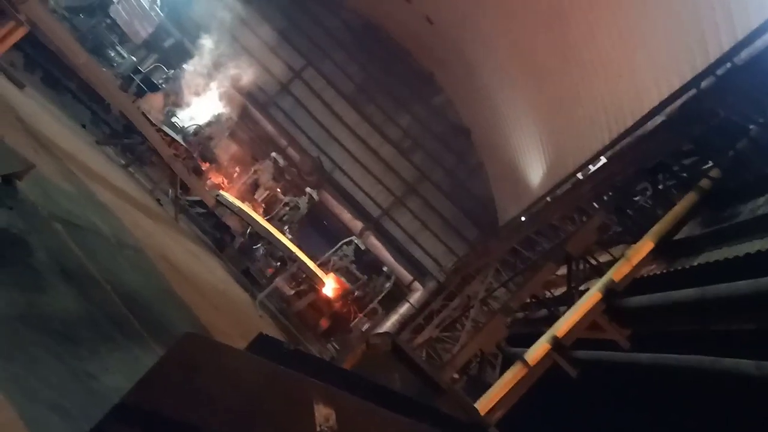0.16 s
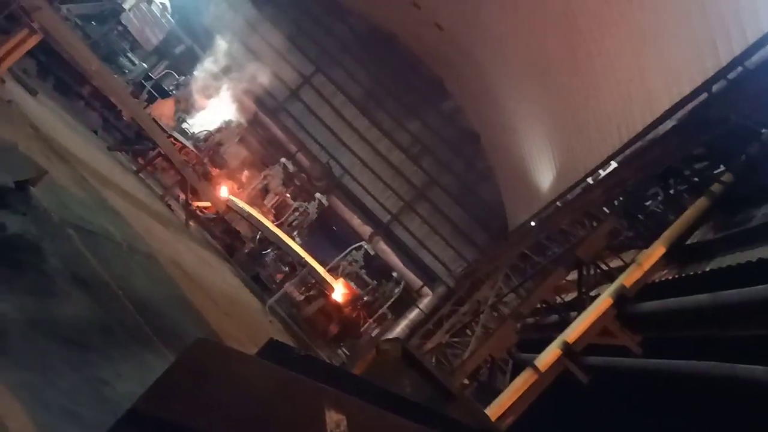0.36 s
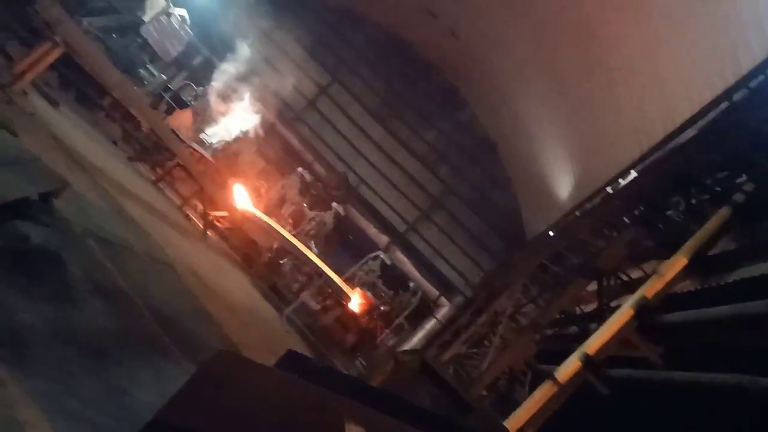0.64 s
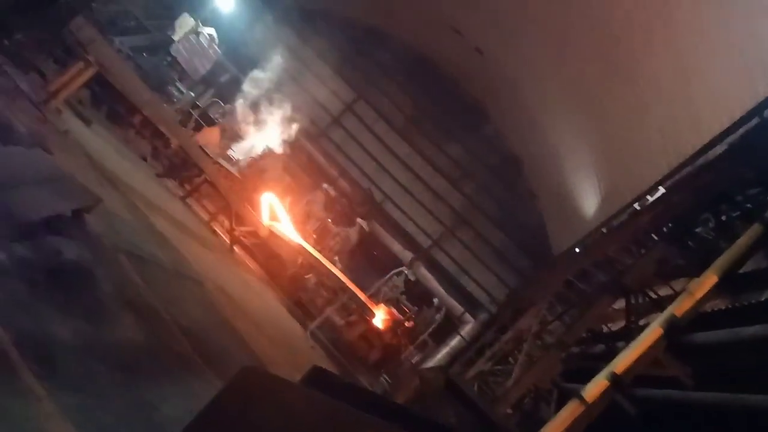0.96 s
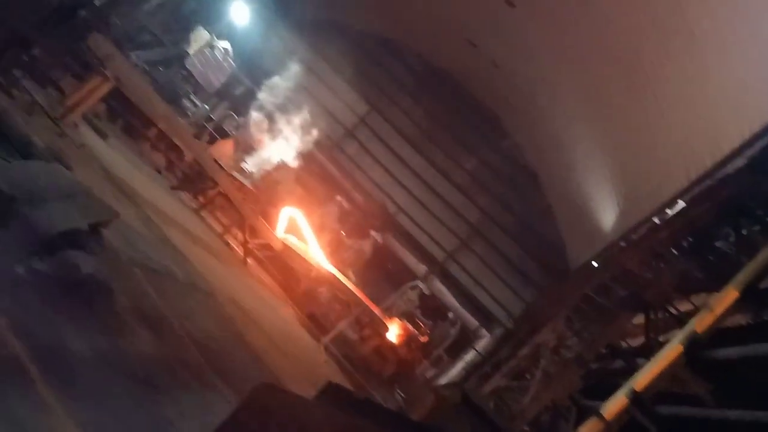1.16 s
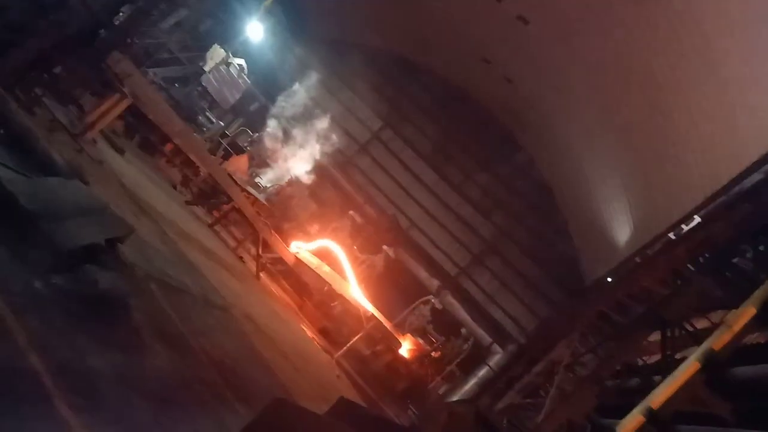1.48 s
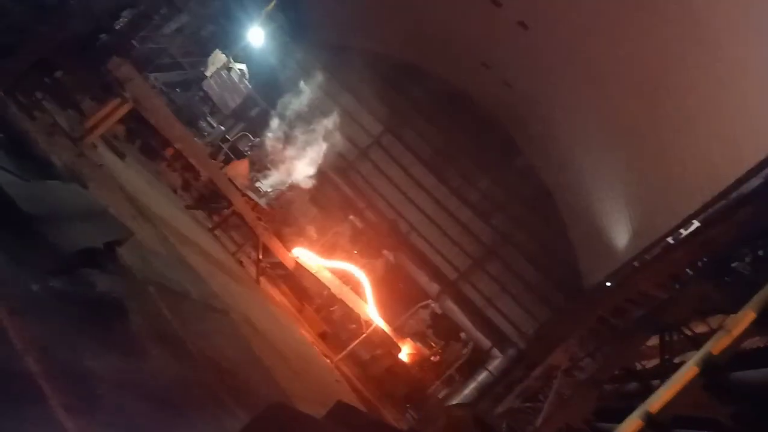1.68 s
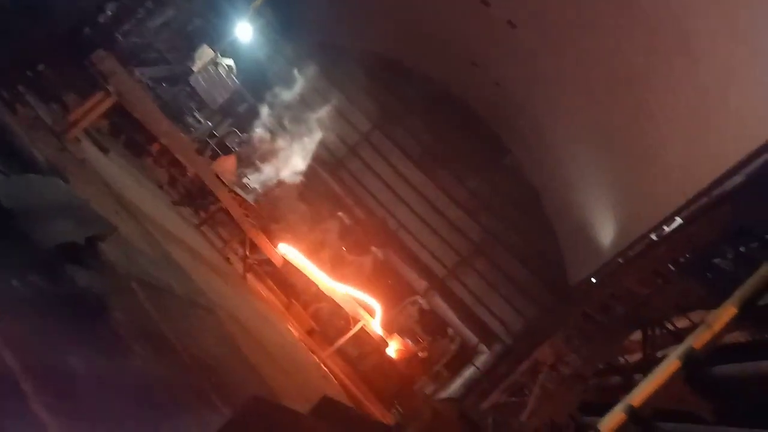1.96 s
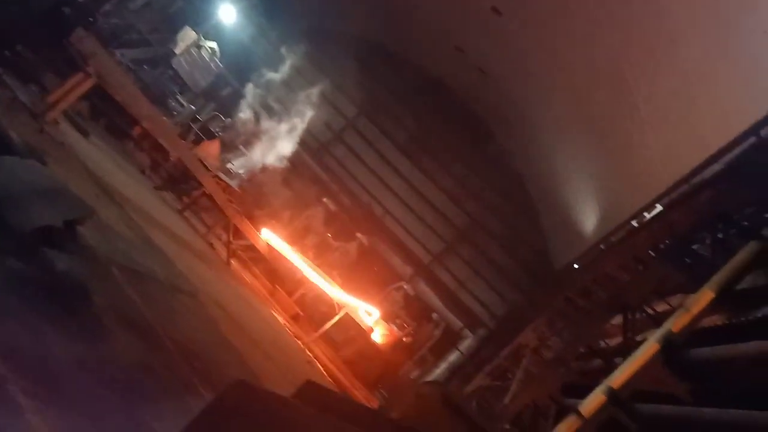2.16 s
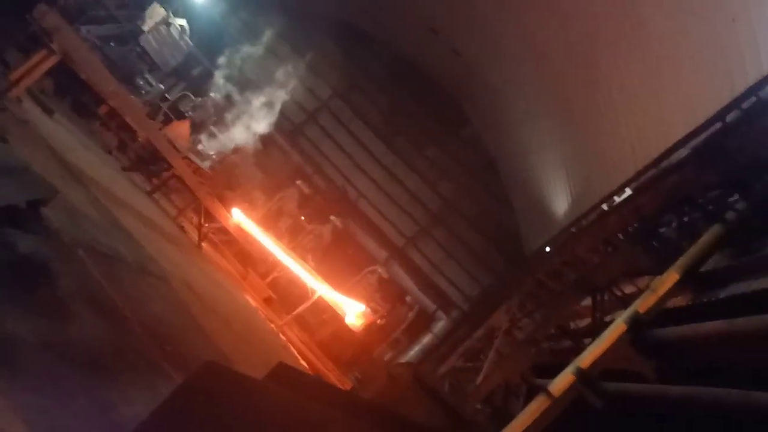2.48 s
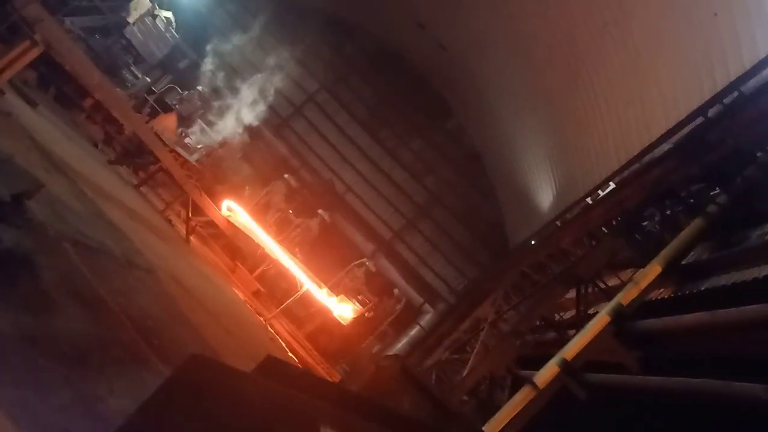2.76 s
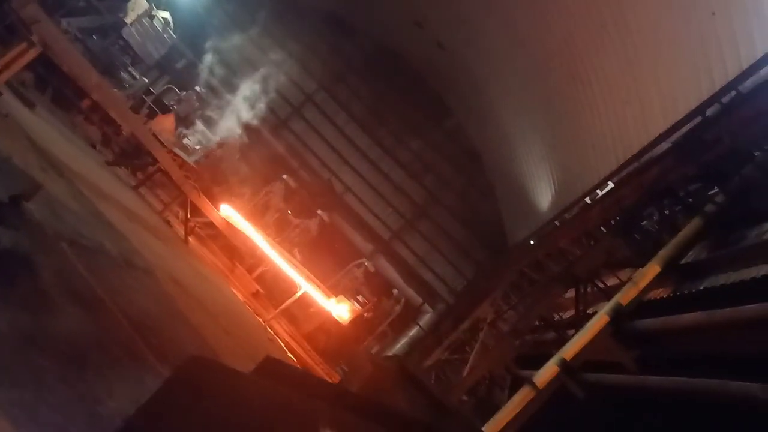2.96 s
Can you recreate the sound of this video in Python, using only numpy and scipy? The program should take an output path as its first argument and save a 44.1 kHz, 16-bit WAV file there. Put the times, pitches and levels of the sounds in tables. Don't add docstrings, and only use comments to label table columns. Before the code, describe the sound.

A steel rolling mill roars and hums continuously while metal bars clank, thud and scrape

```python
import sys
import numpy as np
from scipy import signal
from scipy.fft import rfft, irfft, next_fast_len
from scipy.io import wavfile
from scipy.ndimage import uniform_filter1d

SR = 44100
rng = np.random.default_rng(int(sys.argv[2]) if len(sys.argv) > 2 else 0)


def generate_wav(signal):
    frames = np.transpose(np.atleast_2d(signal))
    scaled = np.clip(frames, -1, 1) * 32767
    pcm = np.round(scaled).astype(np.int16)
    wavfile.write(sys.argv[1], SR, pcm)


def linear_from_db(decibels):
    return 10 ** (np.asarray(decibels, float) / 20)


N = 138033

# frequency [Hz], level [dB].
CRACK = [(700, -18), (1100, 1), (1800, 10), (2700, 11), (3500, 0), (5000, -4), (6400, -8), (7200, -43)]


def evened(x):
    return x / np.sqrt(np.mean(x ** 2) + 1e-20)


def read(points, hz, outside_db=None):
    f, value = np.transpose(points)
    return np.interp(np.log(hz + 1), np.log(f + 1), value, outside_db, outside_db)


def colour(x, points):
    size = next_fast_len(x.shape[-1] + 2048)
    gain = linear_from_db(read(points, np.fft.rfftfreq(size, 1 / SR), -80))
    return irfft(rfft(x, size) * gain, size)[..., :x.shape[-1]]


def resonate(x, hz, width):
    turn = np.exp(2j * np.pi * hz * np.arange(x.shape[-1]) / SR)
    r = np.exp(-np.pi * abs(width) / SR)
    return 2 * (turn * signal.lfilter([1 - r], [1, -r], x / turn)).real


def diffuse(length):
    # frequency in Hz, left-right likeness [-1 to 1].
    likeness = [(60, 1), (130, 0.89), (280, 0.73), (610, 0.26), (1330, -0.097), (2900, -0.02),
                (6290, -0.16)]
    # frequency in Hz, left minus right in dB.
    left_excess = [(60, .3), (130, .2), (280, -1.2), (610, -1.4), (1200, -2), (2400, .9), (4500, .9),
                   (9000, -.8)]
    a, b = rfft(rng.standard_normal((2, length)))
    hz = np.fft.rfftfreq(length, 1 / SR)
    same = np.clip(read(likeness, hz), -1, 1)
    lean = linear_from_db(read(left_excess, hz) / 2)
    right = same * a + np.sqrt(1 - same ** 2) * b
    return irfft(np.array([a * lean, right / lean]), length)


def follow(points):
    return linear_from_db(np.interp(np.arange(N) / SR, *np.transpose(points), -99, -99))


def load(share=1):
    # time in seconds, level in dB.
    effort = [(0, 3.5), (.3, 2), (.6, 3), (.9, 1), (1.2, 1), (1.5, 3), (1.9, 1.5), (2.2, 4.5), (2.6, 1.74),
              (2.9, 1), (3.13, 0.5)]
    return linear_from_db(share * np.interp(np.arange(N) / SR, *np.transpose(effort)))


def restless(x):
    patchy_db, flicker_db = 0.85, 0.3
    z = signal.stft(x, nperseg=512)[2]
    patches = uniform_filter1d(rng.standard_normal(z.shape[1:]), size=8, axis=0)
    patches = evened(uniform_filter1d(patches, size=12, axis=1))
    flicker = evened(uniform_filter1d(rng.standard_normal(z.shape[2]), size=4))
    return signal.istft(z * linear_from_db(patchy_db * patches + flicker_db * flicker), nperseg=512)[1][:, :N]


def roar():
    # frequency in Hz, density in dB per Hz.
    drive_rumble = [(25, -54), (60, -22), (100, -11), (250, -4), (420, -1.5), (800, -5), (1150, -11.5),
                    (1700, -45)]
    water_hiss = [(700, -20), (1300, -1.5), (2700, -5), (3300, -10.5), (4200, -16.5), (6200, -18),
                  (6500, -25), (7300, -35.5)]
    far_air = [(6500, -26), (7000, 6), (7400, -1), (8800, -4.5), (10000, -17.5), (14000, -14.5),
               (15000, -20.5), (15300, -44.5)]

    def noise(shape, db):
        return linear_from_db(db) * evened(colour(diffuse(N + 1), shape)[:, :N])

    rumble = noise(drive_rumble, -24) * load()
    hiss = noise(water_hiss, -32) * load(0.53)
    air = noise(far_air, -64) * load(0.4)
    return restless(rumble + hiss + air)


def hum():
    # frequency in Hz, width in Hz, level in dB, drift in dB per s.
    steady_lines = [(398, 8, -34.5, 1), (435, 8, -36, .5), (478, 10, -38, 1.5), (716, 12, -38, 1),
                    (971, 20, -46, 0), (1141, 10, -45, 0), (1185, 14, -49, 0), (1691, 16, -51, 0),
                    (4473, 10, -64, 0), (4573, 6, -58, 0), (7714, 30, -79, 0)]
    # time in seconds, three levels in dB.
    stand_loads = [(0, -28, -30, -41), (.3, -27, -30, -40), (.42, -27, -31, -41), (.52, -33, -34, -41),
                   (.8, -28, -38, -43), (1.1, -28, -39, -42), (1.4, -28, -37, -41), (1.7, -28, -38, -36),
                   (2.05, -29, -39, -33), (2.25, -28, -37, -36), (2.36, -30, -36, -31),
                   (2.5, -30, -38, -38), (2.8, -31, -41, -39), (3.13, -31.5, -41, -39)]
    # frequencies in Hz, widths in Hz, trims in dB.
    stand_hz = (323, 641, 862)
    stand_width = (4, 8, 8)
    stand_trim_db = (0, 0, 2.5)
    tone_share = 0.78
    beat_per_s, beat_depth = 5.5, 0.4
    shake, t, out = diffuse(N + 1)[:, :N], np.arange(N) / SR, 0
    s, *stands = np.transpose(stand_loads)
    levels = [np.interp(t, s, db) + trim_db for db, trim_db in zip(stands, stand_trim_db)]
    lines = list(zip(stand_hz, stand_width, levels))
    lines += [(hz, w, db + drift_db * (t - t.mean())) for hz, w, db, drift_db in steady_lines]
    for hz, w, db in lines:
        fuzz = evened(resonate(resonate(shake, hz, w), hz, w))
        waver = evened(uniform_filter1d(rng.standard_normal(N), size=8000, mode="wrap"))
        turns = np.cumsum(hz + 0.292 * w * waver) / SR
        port_phase = rng.uniform(0, min(hz / 900, 6), (2, 1))
        tone = np.sqrt(2) * np.sin(2 * np.pi * turns + port_phase)
        beat_phase = 2 * np.pi * (beat_per_s * t + rng.random()) + 2 * waver
        beat = 1 + beat_depth * np.sin(beat_phase)
        out = out + linear_from_db(db) * beat * (tone_share * tone + (1 - tone_share) * fuzz)
    return out


def hall(x):
    # frequency in Hz, reverberation time T60 in seconds.
    decay_times = [(300, 0.34), (1000, 0.36), (2500, 0.41), (6000, 0.4)]
    direct_db = -10
    hz, t, z = signal.stft(diffuse(SR), SR, nperseg=256)
    decay = linear_from_db(-60 * t / read(decay_times, hz)[:, None])
    tail = signal.istft(z * decay, SR, nperseg=256)[1]
    tail = tail / np.linalg.norm(tail[0])
    return linear_from_db(direct_db) * x + signal.fftconvolve(x[None], tail, axes=1)[:, :N]


def knocks(rows, shape, width):
    taps_per_s, rise_s = 6000, 0.002
    blow, blow_s = 1.5, 0.006
    lead = SR // 50
    t, out = np.arange(-lead, SR // 4) / SR, np.zeros(N + SR)
    for s, db, length, ring_hz, ring_db in rows:
        taps = rng.standard_normal(len(t)) * (rng.random(len(t)) < taps_per_s / SR)
        taps = taps * np.clip(t / rise_s, 0, 1) * np.exp(-(t / length) ** 2)
        taps = taps * (1 + blow * np.exp(-abs(t) / blow_s))
        body = evened(colour(taps, shape))
        ring = evened(resonate(resonate(taps, ring_hz, width), ring_hz, width))
        at = round(s * SR) - lead
        out[at:at + len(t)] += linear_from_db(db) * (body + linear_from_db(ring_db) * ring)
    return out[:N]


def clanks():
    # start in seconds, level in dB, length in seconds, ring in Hz, ring share in dB.
    guide_hits = [(.1948, -44, .015, 1830, -10), (.2875, -30, .02, 1920, -16), (.31, -36, .015, 2200, -14),
                  (.328, -37, .015, 1800, -14), (.346, -42, .015, 2700, -10), (.46, -47, .01, 3800, -2),
                  (.485, -39, .03, 2100, -14), (.595, -46, .03, 2000, -12), (.735, -39, .03, 2780, -11),
                  (1.11, -47, .015, 2300, -5), (1.2, -39.5, .04, 2200, -17), (1.378, -44, .012, 2320, 5),
                  (1.65, -50, .012, 2330, 0), (2.058, -44, .03, 2500, -10), (2.161, -36, .008, 2450, -6),
                  (2.19, -43, .03, 3400, -12), (2.3, -42, .04, 2900, -12), (2.331, -32, .015, 2650, -5),
                  (2.414, -38, .02, 2770, -8), (2.48, -45, .03, 2450, -10), (2.66, -45, .03, 2300, -10)]
    return knocks(guide_hits, CRACK, width=220)


def thuds():
    # start in seconds, level in dB, length in seconds, ring in Hz, ring share in dB.
    frame_hits = [(.207, -36, .008, 640, -4), (.29, -28, .018, 720, -4), (.318, -30, .018, 690, -6),
                  (.355, -37, .015, 600, -6), (.405, -37, .012, 340, -3), (1.23, -41, .02, 330, -3),
                  (1.893, -35, .01, 600, -4), (2.165, -33, .03, 460, -3), (2.34, -29, .022, 478, 3),
                  (2.41, -35, .03, 440, -2), (2.67, -37, .015, 400, -3)]
    # frequency in Hz, level in dB.
    frame_tone = [(150, -25), (330, -9), (500, -1), (750, 0), (1050, -5), (1500, -18)]
    return knocks(frame_hits, frame_tone, width=50)


def scrape():
    # time in seconds, level in dB.
    slide_swell = [
        (2.12, -64),
        (2.17, -33),
        (2.26, -30),
        (2.35, -24.5),
        (2.45, -30.5),
        (2.6, -34),
        (2.85, -55),
    ]
    # frequency in Hz, level in dB.
    slide_tone = [(1200, -10), (2000, 2.5), (2900, 3), (3600, -6.5), (5000, -9.5), (6400, -17),
                  (7200, -36.5), (11000, -52)]
    asperities = rng.random(N) < 150 / SR
    roughness = 1.9 + uniform_filter1d(asperities, size=80, output=float) * 40
    grit = diffuse(N + 1)[:, :N] * roughness
    return evened(colour(grit, slide_tone)) * follow(slide_swell)


def puff():
    # time in seconds, level in dB.
    steam_swell = [
        (2.1, -82),
        (2.13, -82),
        (2.16, -74),
        (2.195, -58),
        (2.225, -65),
        (2.3, -74),
        (2.45, -82.5),
    ]
    # frequency in Hz, level in dB.
    steam_tone = [(6000, -36), (7200, 4.5), (9000, 2), (12000, 1.5), (15000, -6)]
    return evened(colour(diffuse(N + 1)[:, :N], steam_tone)) * follow(steam_swell)


def squeak():
    # start in seconds, length in seconds, level in dB.
    slips = [(0.079, .19, -64.5), (0.328, .08, -64.5), (0.724, 0.12, -64), (0.951, 0.056, -66),
             (1.313, 0.11, -64), (1.537, 0.16, -66), (1.926, .12, -61.5), (2.205, .1, -68.5),
             (2.781, 0.07, -66.5)]
    squeak_hz, squeak_width = 8700, 33
    t = np.arange(N) / SR
    gate = sum(linear_from_db(db) * ((t > s) & (t < s + length)) for s, length, db in slips)
    tone = evened(resonate(rng.standard_normal((2, N)), squeak_hz, squeak_width))
    return linear_from_db(1.0) * tone * uniform_filter1d(gate, size=500)


def clatter():
    ticks_per_s, clatter_db, spread_db = 72, -42.5, 4
    ring_width = 220
    struck = rng.random(N) < ticks_per_s / SR
    size = linear_from_db(spread_db * np.minimum(rng.exponential(1, N), 4)) * struck
    plate = rng.integers(0, 8, N)
    rings = 0
    for k, hz in enumerate(np.geomspace(1300, 3600, num=8)):
        hits = size * (plate == k)
        rings = rings + resonate(resonate(hits, hz, ring_width), hz, ring_width)
    return linear_from_db(clatter_db) * (0.29 * evened(rings) + evened(colour(size, CRACK)))


def scene():
    machinery = roar() + hum() + squeak()
    impacts = hall(clanks()) + hall(thuds()) + hall(clatter())
    return machinery + impacts + scrape() + puff()


def band_limit(x):
    return signal.sosfilt(signal.butter(12, 15250, fs=SR, output="sos"), x)


def record(dry):
    t = np.arange(N) / SR
    ramp_s = 0.002
    mix = dry * np.clip(np.minimum(t, t[::-1]) / ramp_s, 0, 1)
    return band_limit(mix)


dry = scene()
out = record(dry)
generate_wav(out)
```